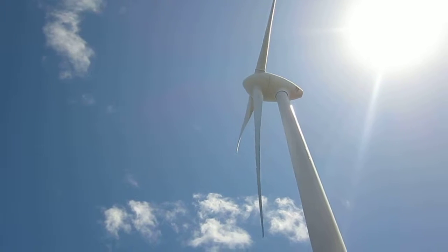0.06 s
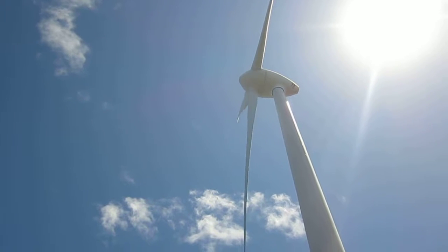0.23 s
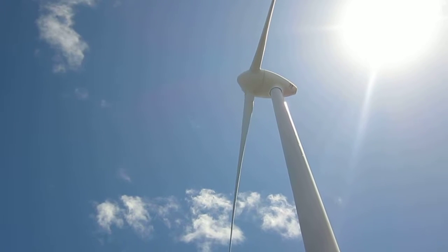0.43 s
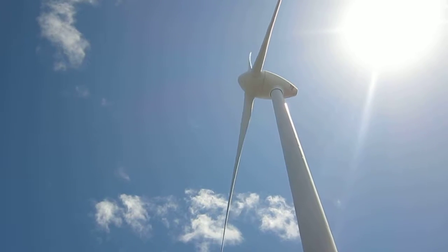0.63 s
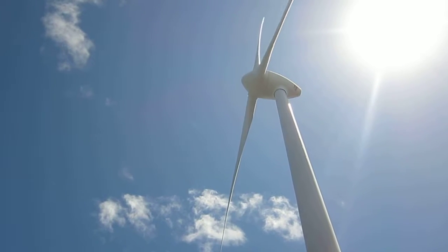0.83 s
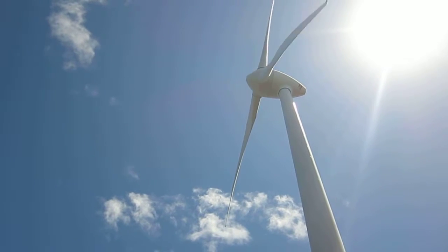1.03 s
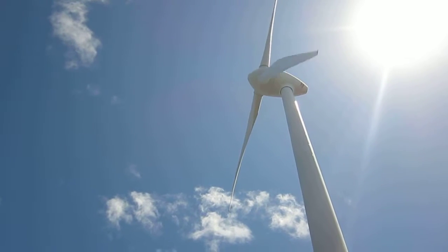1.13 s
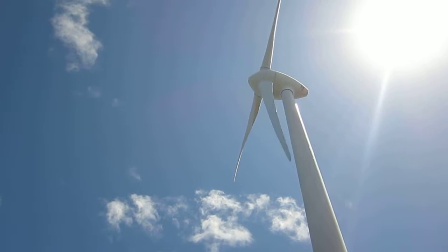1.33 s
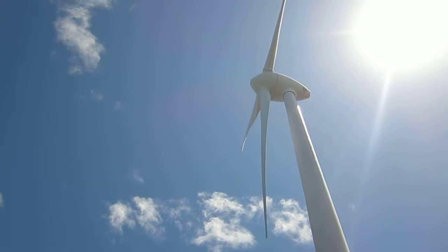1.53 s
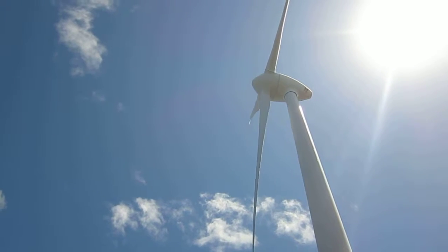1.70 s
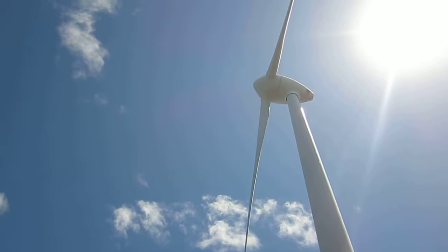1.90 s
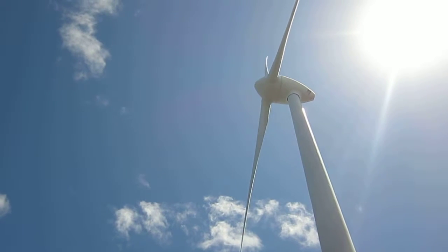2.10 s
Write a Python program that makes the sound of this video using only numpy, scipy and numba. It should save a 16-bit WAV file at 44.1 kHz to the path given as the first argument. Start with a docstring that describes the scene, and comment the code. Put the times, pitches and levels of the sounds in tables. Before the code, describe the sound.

Gusty wind thumps and rumbles on the microphone beside a wind turbine, then eases off

```python
"""Gusty wind under a turbine

Gusts buffet a small microphone port: brighter noise bursts, single eddies that slap it, a low rumble.
Behind them air rushes, grass hisses in swells and a few faint whistles fall far off: all shaped noise.
A gain control ducks when the level passes a threshold, most under the strongest gusts, then recovers."""
import sys
import numpy as np
from scipy import signal
from scipy.fft import rfft, irfft, next_fast_len
from scipy.io import wavfile
from scipy.ndimage import uniform_filter1d, map_coordinates
from numba import njit

SR = 44100
rng = np.random.default_rng(int(sys.argv[2]) if len(sys.argv) > 2 else 0)


def store_wav(level_fs):
    """Save 16-bit WAV to argv[1]."""
    pcm = np.round(np.clip(np.atleast_2d(level_fs), -1, 1) * 32767)
    wavfile.write(sys.argv[1], SR, pcm.T.astype(np.int16))


N = 94815
# All source levels are ahead of the gain control.


def amp(db):
    """Decibels to gain."""
    return 10 ** (np.asarray(db) / 20)


def unit(x):
    """Scaled to rms 1."""
    return x / np.sqrt(np.mean(x ** 2) + 1e-20)


def colour(points, hz):
    """Gain at hz, interpolated between (Hz, dB) points on a log frequency axis."""
    point_hz, point_db = np.transpose(points)
    return amp(np.interp(np.log(hz + 1), np.log(point_hz + 1), point_db))


def curve(rows):
    """One value per sample from (s, value) rows."""
    return np.interp(np.arange(N) / SR, *np.transpose(rows))


def wobble(knots_per_s):
    """Smooth random curve through normally distributed knots."""
    knots = rng.standard_normal(4096)
    return map_coordinates(knots, [np.arange(N) * knots_per_s / SR], mode="wrap")


def filtered(x, response):
    """x with its spectrum multiplied by response(hz)."""
    size = next_fast_len(N + 8192)
    hz = np.fft.rfftfreq(size, 1 / SR)
    return irfft(rfft(x, size) * response(hz), size)[:N]


PATCHY_DB = 1.26  # rms


def air(spectrum):
    """Turbulent air: coloured noise of rms 1, its gain patchy in time and frequency."""
    bins = signal.stft(rng.standard_normal(N), nperseg=512)[2]
    field = uniform_filter1d(rng.standard_normal(bins.shape), size=7, axis=0)
    field = uniform_filter1d(field, size=12, axis=1)
    patchy = signal.istft(bins * amp(PATCHY_DB * unit(field)), nperseg=512)[1][:N]
    return unit(filtered(patchy, lambda hz: colour(spectrum, hz)))


# Gusts on the port. Each row: start in seconds, length in seconds, level in dB, roll-off in Hz.
GUSTS = [ (0.031, 0.012, -39.5, 314), (0.086, 0.049, -30.5, 210), (0.208, 0.014, -26, 297),
         (0.261, 0.049, -22.5, 385), (0.273, 0.009, -21, 784), (0.34, 0.015, -15, 1090),
         (0.362, 0.052, -17.5, 575), (.379, 0.0034, -16.5, 1370), (0.386, 0.0077, -11, 1056),
         (0.401, 0.081, -14, 546), (0.4205, 0.0035, -20, 1150), (0.437, 0.005, -11, 930),
         (0.453, .002, -18, 1376), (0.4642, 0.00193, -20, 1300), (0.506, 0.017, -20.5, 460),
         (0.526, 0.013, -21, 610), (0.538, 0.078, -30, 310), (0.654, 0.0385, -23.5, 349),
         (0.677, .006, -31, 617), (0.712, 0.04, -21, 361), (0.795, 0.0046, -26, 820),
         (.807, .005, -23, 810), (0.933, 0.0095, -31, 390), (1.071, 0.11, -31.5, 113),
         (1.163, 0.0092, -28.5, 243), (1.196, 0.032, -32, 150), (1.26, 0.04, -20.5, 263),
         (1.28, 0.0543, -29, 494), (1.477, 0.012, -31.5, 220), (1.577, 0.037, -28, 474),
         (1.636, 0.017, -30.5, 425), (1.717, 0.0052, -33, 296), (1.763, 0.036, -28, 92.6),
         (1.784, 0.021, -36.5, 336), (1.84, 0.016, -37, 240), (1.95, 0.029, -43.5, 125)]
# Gust spectrum before band limits. Each row: frequency in Hz, relative density in dB per Hz.
GUST_SPECTRUM = [(20, -6), (60, -4), (160, 4.5), (300, -4), (700, -14), (1300, -19), (2100, -19.5),
                 (3000, -36)]
GUST_ATTACK_S, GUST_RELEASE_CYCLES = 0.0033, 3.37  # release time constant in cycles of the roll-off
GUST_LOW_SHARE, GUST_STEEPNESS = 0.19, 4.24  # lower edge over roll-off; order of the roll-off
GUST_FLUTTER_DB, GUST_FLUTTER_KNOTS_PER_S = 4.5, 250


def gusts():
    """Unsteady turbulent bursts; faster air has smaller eddies, reaches higher and dies sooner."""
    t, out = np.arange(N) / SR, np.zeros(N)
    for start_s, length_s, level_db, edge_hz in GUSTS:
        attack = np.clip((t - start_s) / GUST_ATTACK_S + .5, 0, 1)
        decay = np.clip((t - start_s - length_s) * edge_hz / GUST_RELEASE_CYCLES, 0, 20)
        shape = attack * np.exp(-decay)
        flutter = amp(GUST_FLUTTER_DB * wobble(GUST_FLUTTER_KNOTS_PER_S))
        force = shape * rng.standard_normal(N) * flutter

        def response(hz):
            """Gust spectrum between a lower edge and the roll-off."""
            low_cut = hz / np.hypot(hz, GUST_LOW_SHARE * edge_hz)
            high_cut = 1 / np.hypot(1, (hz / edge_hz) ** GUST_STEEPNESS)
            return colour(GUST_SPECTRUM, hz) * low_cut * high_cut

        burst = filtered(force, response)
        # energy set by the envelope and level alone
        out += amp(level_db) * burst * np.linalg.norm(shape) / np.linalg.norm(burst)
    return out


# Single eddies that slap the port. Each row: time in seconds, peak in dB, centre in Hz.
SLAPS = [(.278, -4.5, 290), (.2825, -6.5, 186), (.337, -5, 444), (0.394, -0.5, 328), (.442, 0, 235),
         (0.4581, 3.5, 231), (0.467, -5, 372), (.499, -3, 217), (1.582, -21.5, 259), (1.599, -19.5, 310),
         (1.6118, -22, 268)]


def slaps():
    """One eddy gives one sharp pressure peak between two shallow troughs."""
    t, out = np.arange(N) / SR, np.zeros(N)
    for time_s, peak_db, centre_hz in SLAPS:
        u = np.clip(2 * np.pi * centre_hz * (t - time_s) / 1.69, -20, 20)
        out += amp(peak_db) * (2 / np.cosh(u) ** 3 - 1 / np.cosh(u))
    return out


# Turbulence at the port. Each row: time in seconds, level in dB.
RUMBLE_LEVEL = [(0, -41), (.06, -40), (.1, -34), (.18, -32.5), (.25, -33), (.32, -22.5), (.46, -18.5),
                (.57, -33), (.73, -26.5), (.85, -30), (.99, -33.5), (1.04, -47), (1.09, -33.5),
                (1.32, -27.5), (1.42, -33), (1.57, -30.5), (1.83, -35.5), (1.92, -43), (2.15, -45.5)]
# Rumble spectrum. Each row: frequency in Hz, relative density in dB per Hz.
RUMBLE_SPECTRUM = [(10, -24), (30, 0.5), (70, 4), (130, -1.5), (190, -11.5), (280, -19.5), (450, -35),
                   (900, -75), (2000, -120)]
RUMBLE_LUMPS_DB, RUMBLE_KNOTS_PER_S = 0.5, 28.045


def rumble():
    """Large slow eddies push on the port all the time."""
    lumps = amp(RUMBLE_LUMPS_DB * wobble(RUMBLE_KNOTS_PER_S))
    return unit(air(RUMBLE_SPECTRUM) * lumps) * amp(curve(RUMBLE_LEVEL))


# Rush of air. Each row: time in seconds, level in dB.
RUSH_LEVEL = [(0, -56), (.3, -52.5), (.6, -49), (.95, -46.5), (1.3, -50.5), (1.7, -51.5), (2.15, -46.5)]
# Rush spectrum. Each row: frequency in Hz, relative density in dB per Hz.
RUSH_SPECTRUM = [(100, 5), (350, -1), (540, -0.5), (750, -3.5), (1200, -10), (2000, -14), (3200, -17),
                 (6000, -17.5), (10000, -29), (15500, -51.5)]


def rush():
    """Broad rush of wind and rotor: coloured noise whose level drifts."""
    return air(RUSH_SPECTRUM) * amp(curve(RUSH_LEVEL))


# Swells of the high hiss. Each row: time in seconds, level in dB before flutter.
HISS_LEVEL = [(0, -58), (.07, -60.5), (.19, -63.5), (.28, -57), (.36, -64.5), (.6, -68.5), (1.1, -65.5),
              (1.17, -63), (1.22, -54), (1.27, -61.5), (1.395, -59.5), (1.455, -52.5), (1.51, -57),
              (1.54, -55.5), (1.66, -65), (1.92, -68), (1.99, -64), (2.15, -69.5)]
# Hiss spectrum. Each row: frequency in Hz, relative density in dB per Hz.
HISS_SPECTRUM = [(1000, -26), (3000, -4.5), (5000, 2.5), (8000, 1.5), (11000, -1), (13000, -9.5),
                 (15500, -14)]
HISS_FLUTTER_DB, HISS_KNOTS_PER_S = 1.4, 39.64


def hiss():
    """Grass hiss: high noise that swells and flutters."""
    level_db = curve(HISS_LEVEL) + HISS_FLUTTER_DB * wobble(HISS_KNOTS_PER_S)
    return air(HISS_SPECTRUM) * amp(level_db)


# Rustle in the middle treble. Each row: time in seconds, level in dB.
RUSTLE_LEVEL = [(0, -59.5), (.3, -60), (.7, -63), (1.2, -60), (1.46, -57), (1.8, -59), (2.15, -60)]
# Rustle spectrum. Each row: frequency in Hz, relative density in dB per Hz.
RUSTLE_SPECTRUM = [(800, -13), (1800, -1), (2800, 3), (4200, -1), (7000, -22.5), (14000, -36.5)]


def rustle():
    """Middle-treble noise that swells gently."""
    return air(RUSTLE_SPECTRUM) * amp(curve(RUSTLE_LEVEL))


# Faint whistles. Each row: start in seconds, length in seconds, starting pitch in Hz, level in dB.
WHISTLES = [(0.066, 0.056, 3470, -60), (0.295, 0.045, 3400, -54.5), (0.895, 0.025, 2280, -53),
            (.93, 0.03, 2034, -55), (1.443, 0.051, 2685, -64), (1.757, .05, 3440, -58.5)]
WHISTLE_FALL_OCT_PER_S, WHISTLE_KNOTS_PER_S = 9, 330  # more knots: a wider, airier band


def whistles():
    """Narrow, airy bands of noise that slide down in pitch."""
    t, out = np.arange(N) / SR, np.zeros(N)
    for start_s, length_s, start_hz, level_db in WHISTLES:
        age_s = np.clip(t - start_s, 0, length_s)
        pitch_hz = start_hz * 2 ** (-WHISTLE_FALL_OCT_PER_S * age_s)
        phase = 2 * np.pi * np.cumsum(pitch_hz) / SR
        tone = wobble(WHISTLE_KNOTS_PER_S) * np.cos(phase) + wobble(WHISTLE_KNOTS_PER_S) * np.sin(phase)
        out += amp(level_db) * np.sin(np.pi * age_s / length_s) * tone
    return out


def scene():
    """The buffeting and the open air at one microphone."""
    buffeting = gusts() + slaps() + rumble()
    open_air = rush() + hiss() + rustle() + whistles()
    return (buffeting + open_air)[None]


@njit
def follow(wanted, rise_samples, fall_samples):
    """One-pole follower with separate time constants for rise and fall."""
    out, state = np.zeros(len(wanted)), 0.
    for i in range(len(wanted)):
        state += (wanted[i] - state) / (rise_samples if wanted[i] > state else fall_samples)
        out[i] = state
    return out


THRESHOLD_DB, SQUEEZE_DB_PER_DB, DUCK_S, RECOVER_S = -25.5, 0.8, 0.14, 0.35
TOP_HZ = 15700


def record(dry):
    """Gain control turns loud gusts down; nothing passes above the band limit."""
    x = dry[0]
    power = np.abs(uniform_filter1d(x ** 2, size=900))
    level_db = 10 * np.log10(power + 1e-12)
    wanted_db = SQUEEZE_DB_PER_DB * np.maximum(level_db - THRESHOLD_DB, 0)
    duck_db = follow(wanted_db, DUCK_S * SR, RECOVER_S * SR)
    return filtered(x * amp(-duck_db), lambda hz: hz < TOP_HZ)[None]


dry = scene()
out = record(dry)
store_wav(out)
```